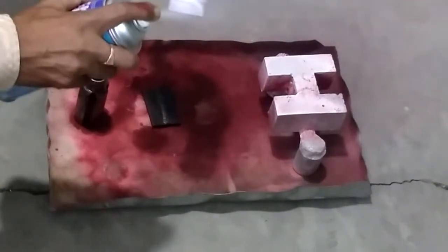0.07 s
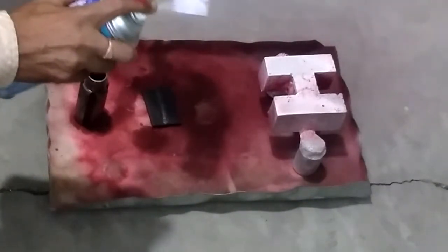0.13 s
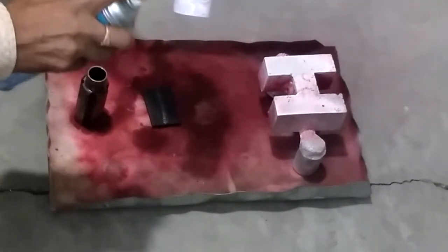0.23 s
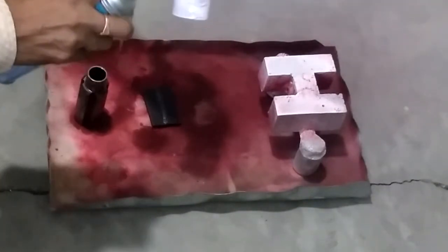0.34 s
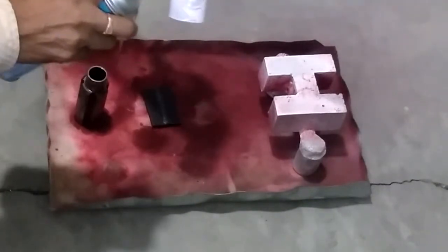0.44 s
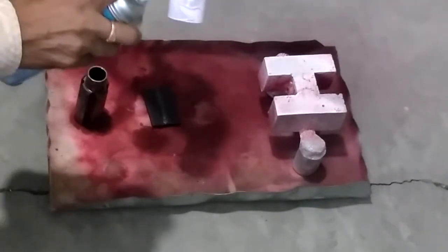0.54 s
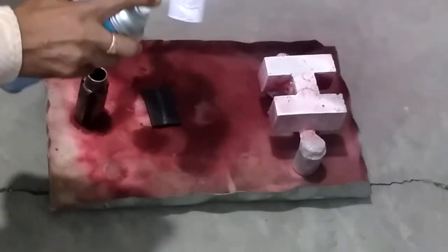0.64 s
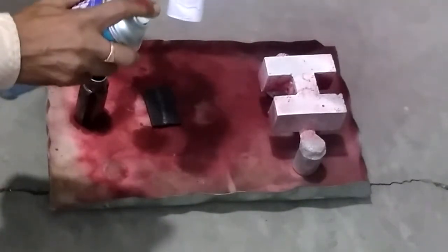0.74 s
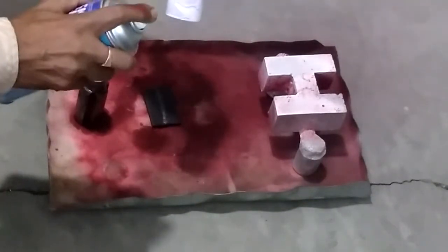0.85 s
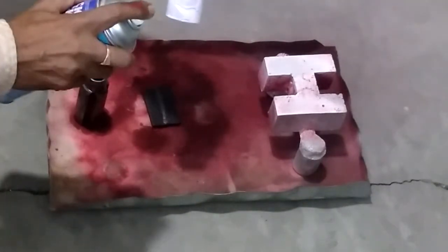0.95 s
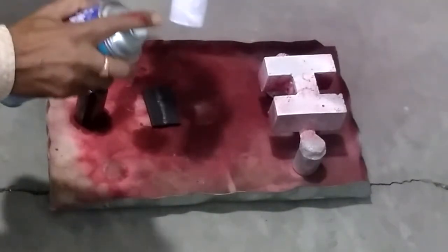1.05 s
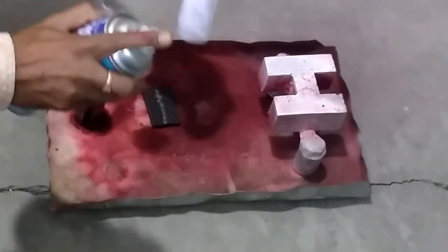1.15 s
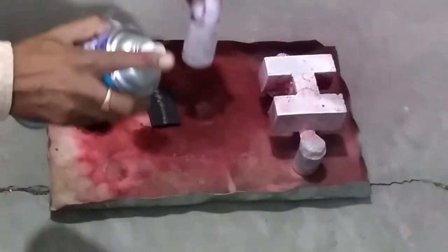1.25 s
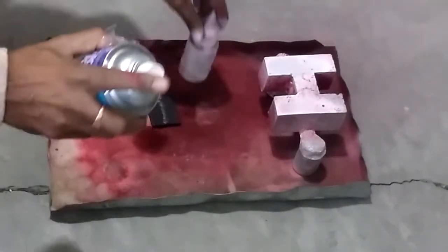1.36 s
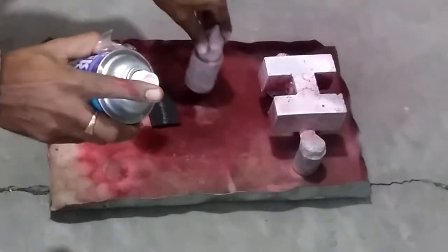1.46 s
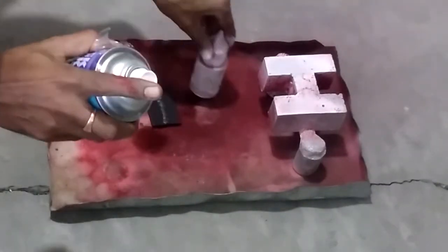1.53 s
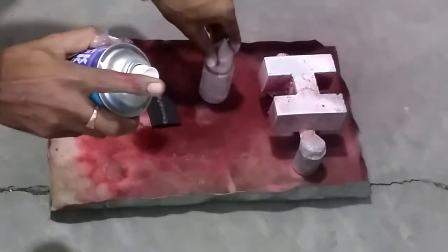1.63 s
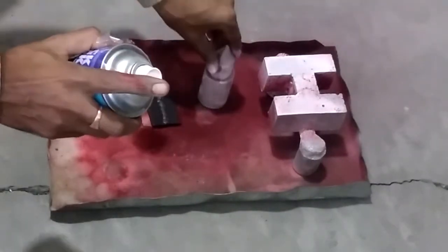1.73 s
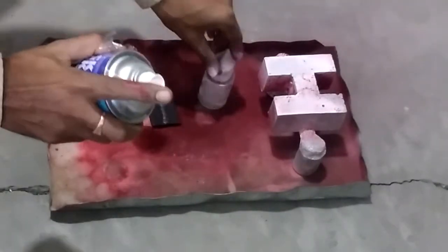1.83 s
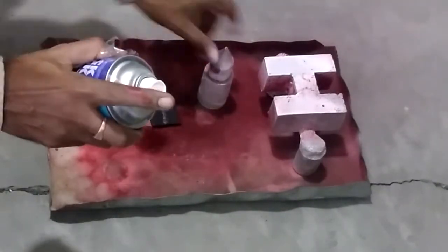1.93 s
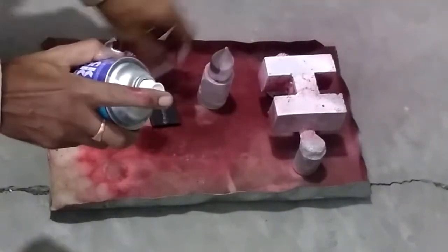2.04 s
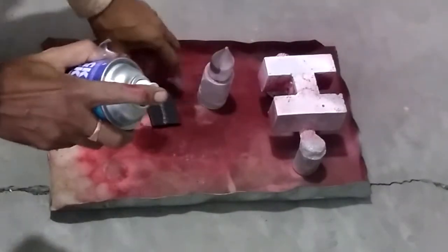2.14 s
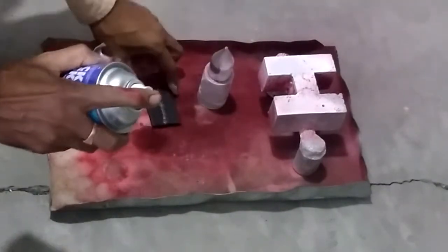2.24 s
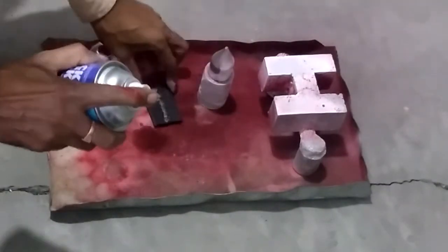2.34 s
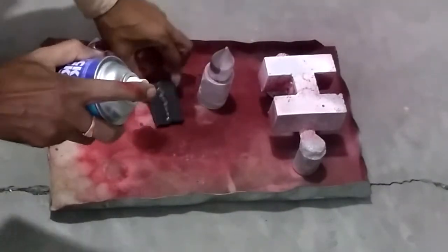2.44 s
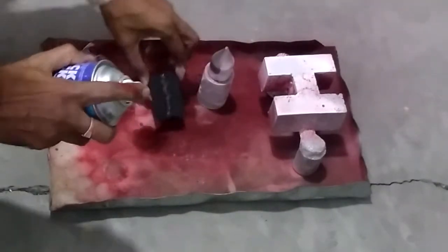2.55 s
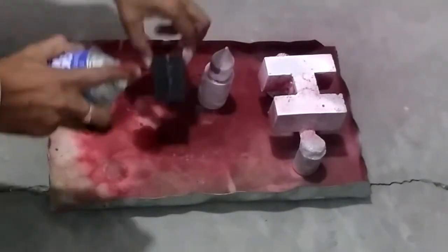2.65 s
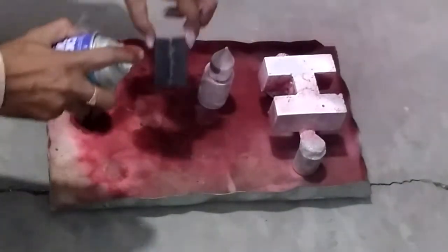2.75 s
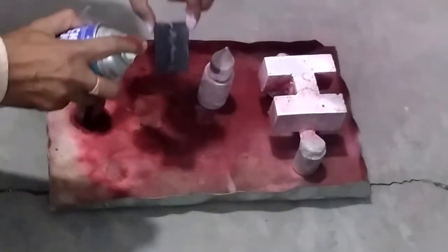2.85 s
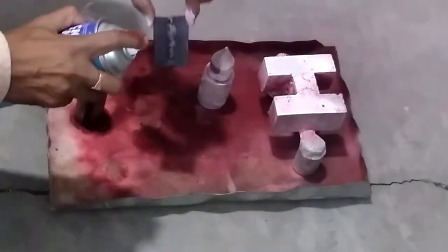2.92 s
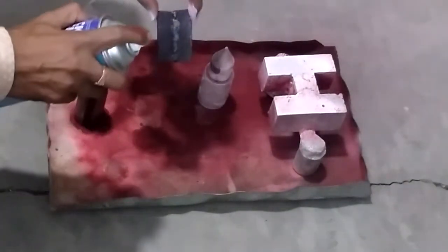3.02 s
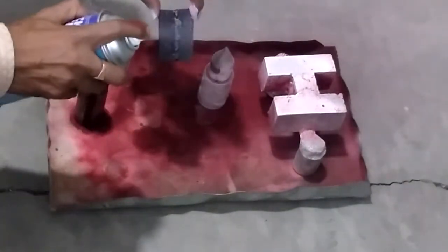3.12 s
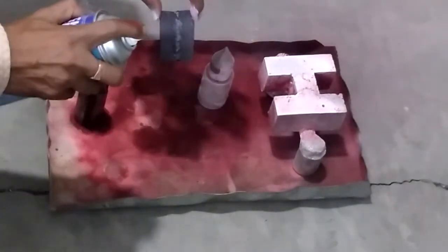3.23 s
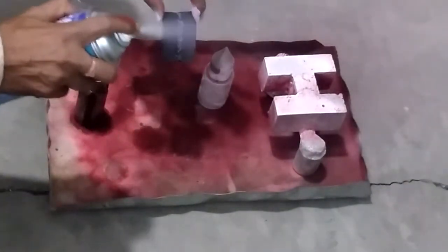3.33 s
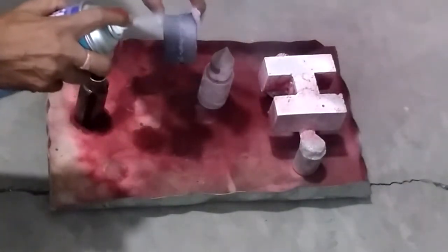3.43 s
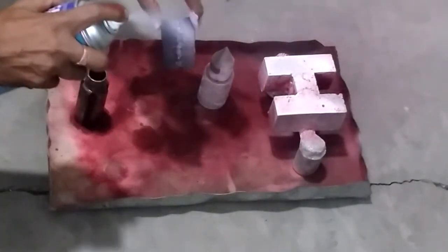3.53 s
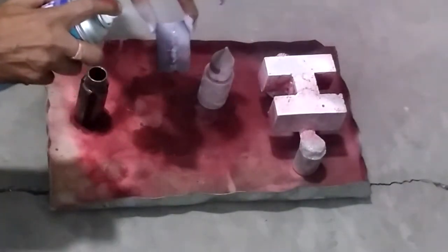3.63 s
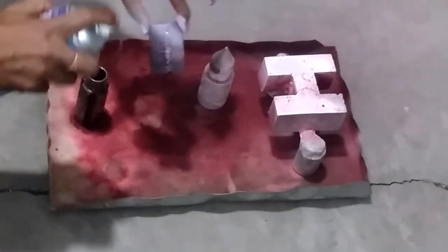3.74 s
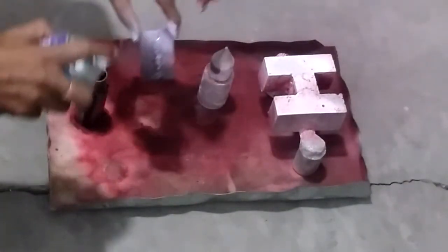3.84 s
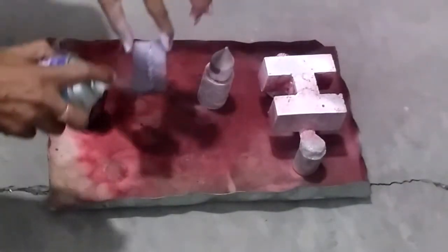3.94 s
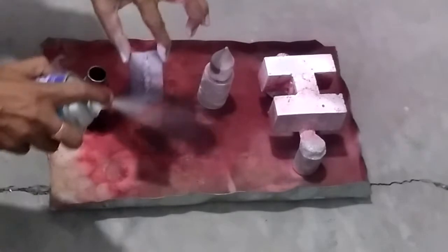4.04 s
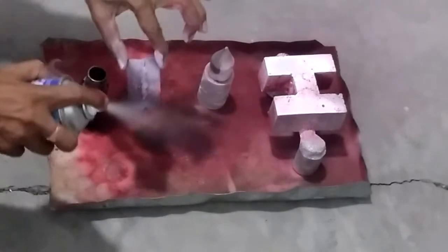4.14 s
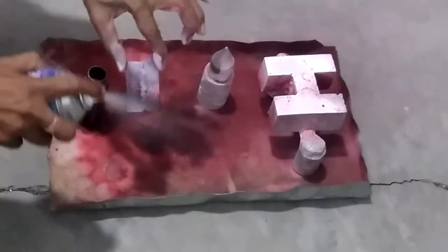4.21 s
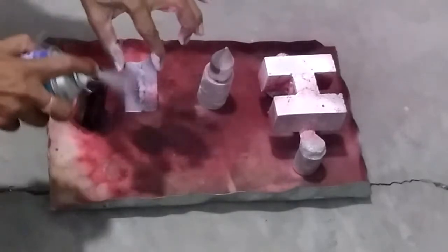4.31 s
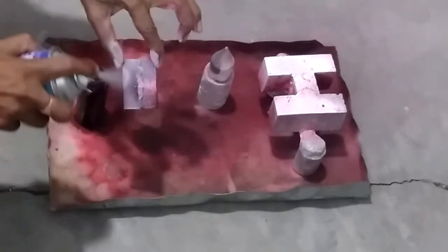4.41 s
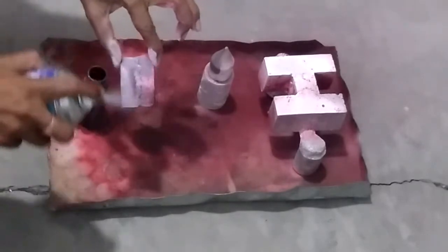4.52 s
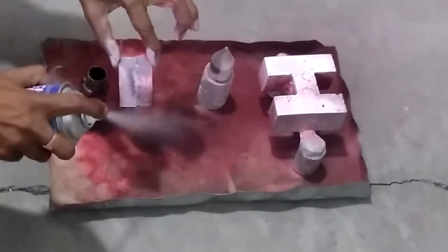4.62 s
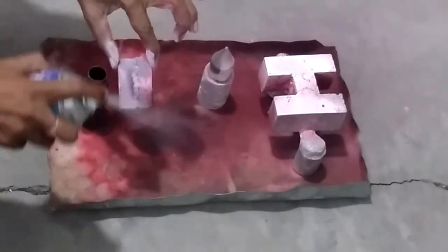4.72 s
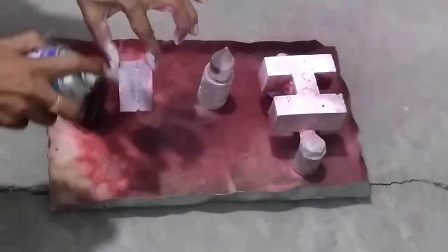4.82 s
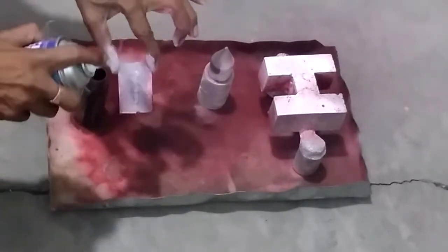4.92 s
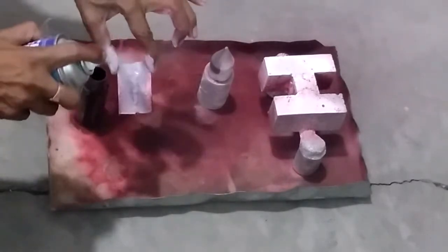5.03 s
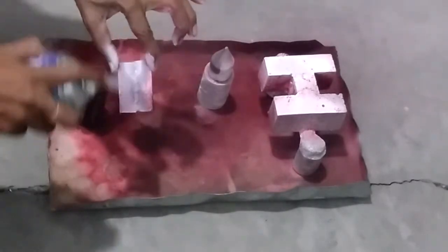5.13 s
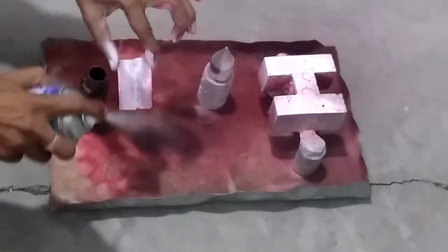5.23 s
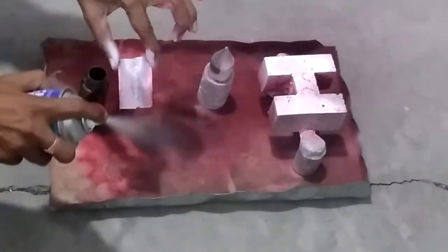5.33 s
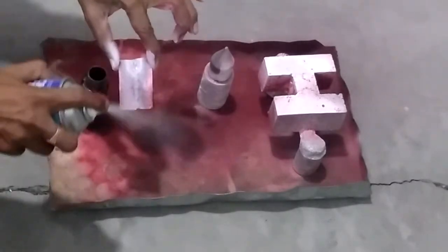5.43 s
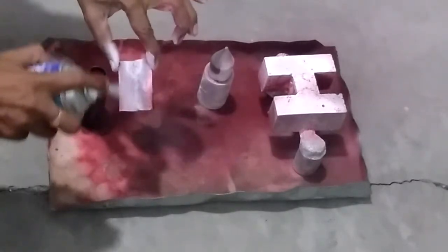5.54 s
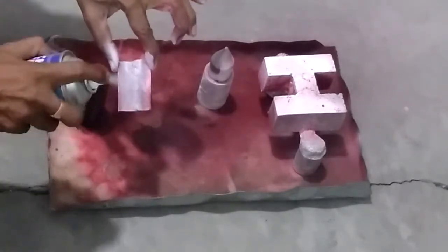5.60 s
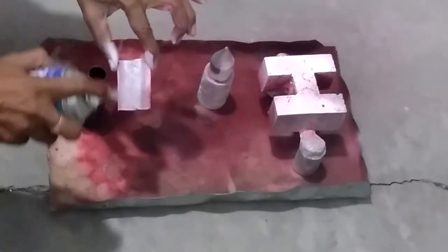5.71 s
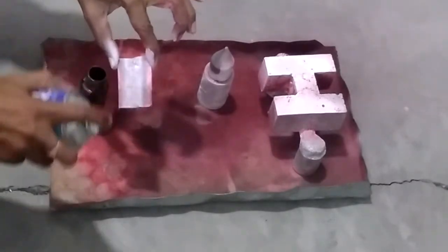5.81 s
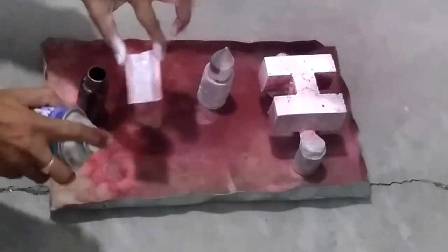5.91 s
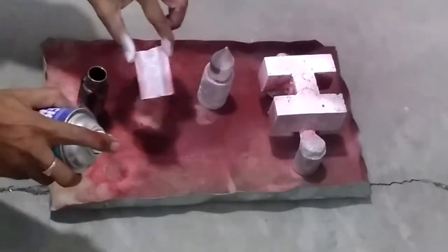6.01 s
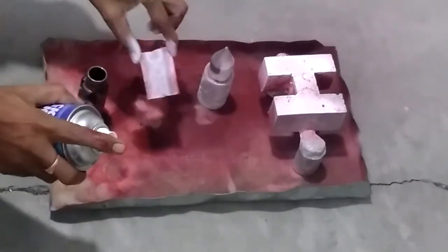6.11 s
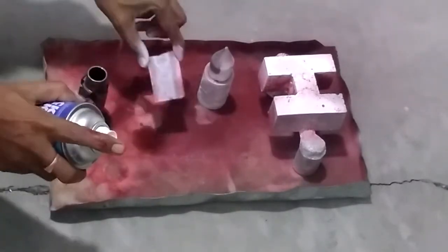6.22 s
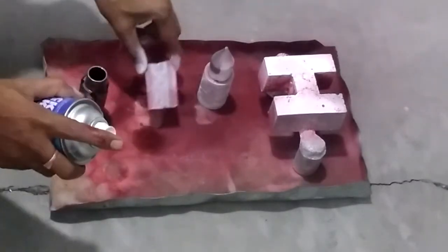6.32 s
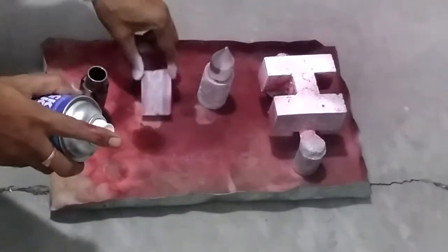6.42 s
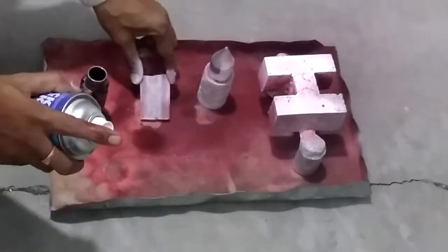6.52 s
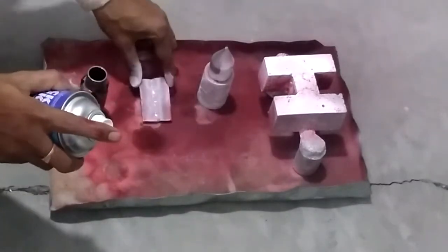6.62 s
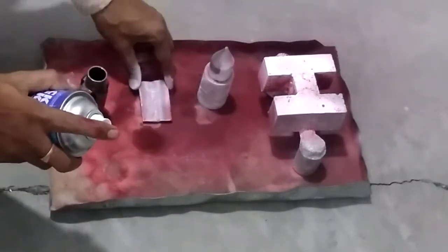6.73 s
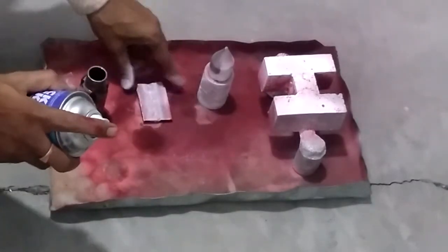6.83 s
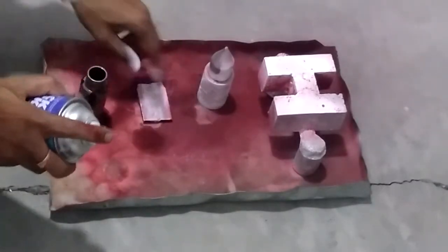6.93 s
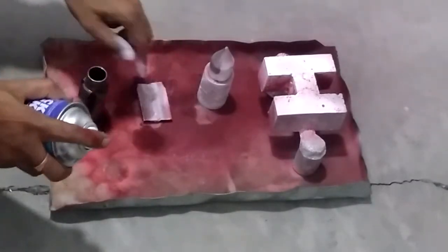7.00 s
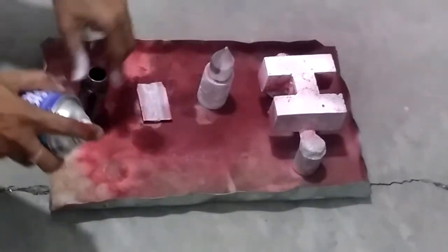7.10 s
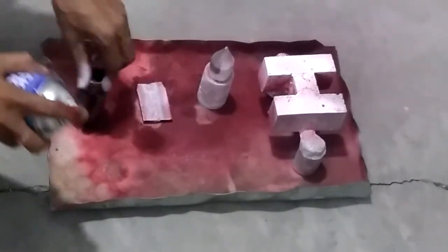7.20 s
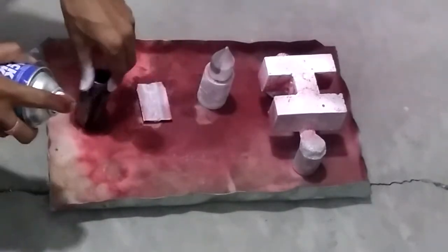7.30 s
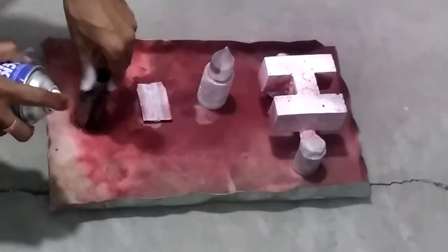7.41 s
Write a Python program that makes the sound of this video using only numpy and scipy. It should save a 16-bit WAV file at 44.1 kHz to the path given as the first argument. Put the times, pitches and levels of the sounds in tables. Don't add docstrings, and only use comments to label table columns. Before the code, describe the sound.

A spray can is already hissing at 0, close and airy with a hollow hum near 700 Hz, weakening and shutting off by 0.7 s. Quiet hall rumble and faint air follow, with a tiny tick at 1.0. At 1.7 a metal part clacks sharply on the board, with another knock at 1.8; softer thuds come at 2.2-2.35, while a far motor drones low and rises slightly until 2.8. At 3.0 the spray returns gently, strengthens at 3.25, dips around 3.8, then roars fully from 4.0 to 5.7 with small surges. As it closes, the valve spits trains of thin, high puffs from 5.7 to 6.2. Parts knock at 6.45 and 6.55, then a loud clack lands at 6.75. From 7.1 small clinks and scrapes chatter, with a firmer knock at 7.17, to the end. Short hard-hall echo; close stereo phone microphones.

```python
import sys
import numpy as np
from scipy import signal
from scipy.fft import rfft, irfft, next_fast_len
from scipy.io import wavfile
from scipy.ndimage import uniform_filter1d, map_coordinates

SR = 44100
rng = np.random.default_rng(int(sys.argv[2]) if len(sys.argv) > 2 else 0)


def volts_from_db(level):
    exponent = np.asarray(level, float) / 20
    return 10 ** exponent


def log_audio(samples):
    frames = np.atleast_2d(samples).T
    limited = np.clip(frames, -1, 1)
    pcm = np.round(limited * 32767).astype(np.int16)
    wavfile.write(sys.argv[1], SR, pcm)


N = 328986

# (frequency [Hz], likeness [0..1])
PORT_LIKENESS = [(60, 0.96), (500, 0.75), (1200, 0.12), (2500, 0.017), (15000, 0.012)]


def unit(x):
    return x / np.sqrt(np.mean(x ** 2) + 1e-20)


def along(points, hz):
    f, *columns = np.transpose(points)
    return np.array([np.interp(np.log(hz + 1), np.log(f + 1), column) for column in columns])


def wobble(rate):
    knots = rng.standard_normal(int(N * rate / SR) + 4)
    return map_coordinates(knots, [np.arange(N) * rate / SR])


def filtered(x, response):
    n = x.shape[-1]
    m = next_fast_len(n + 8192)
    return irfft(rfft(x, m) * response(np.fft.rfftfreq(m, 1 / SR)), m)[..., :n]


def modes(table):
    return lambda f: sum(volts_from_db(db) * 1j * f * w / (c * c - f * f + 1j * f * w) for c, w, db in table)


def at_ports(pair, alike=PORT_LIKENESS):
    def shares(hz):
        angle = np.arccos(np.clip(along(alike, hz)[0], -1, 1)) / 2
        return np.array([np.cos(angle), np.sin(angle)])

    mid, side = filtered(pair, shares)
    return np.array([mid + side, mid - side])


def rush(spectrum, patchy_db, alike=PORT_LIKENESS):
    z = signal.stft(rng.standard_normal((2, N)), nperseg=512)[2]
    field = uniform_filter1d(rng.standard_normal(z.shape[1:]), size=8, axis=0)
    field = uniform_filter1d(field, size=12, axis=1)
    pair = signal.istft(z * volts_from_db(patchy_db * unit(field)), nperseg=512)[1][:, :N]
    colored = filtered(pair, lambda hz: volts_from_db(along(spectrum, hz)))
    return unit(at_ports(colored, alike))


def spray():
    # (frequency [Hz], density [dB per Hz])
    hiss_spectrum = [(4000, -13.5), (7000, 0.5), (9000, -0.5), (10500, 0), (12000, 3.5), (13000, -2.5),
                     (14200, 5), (15500, 1)]
    # (frequency [Hz], density [dB per Hz])
    plume_spectrum = [(60, -52), (300, -5.5), (900, -1.5), (1300, 2), (2000, 3.5), (2650, 6.5),
                      (3000, -13.5), (3400, -0.5), (4500, -0.5), (7000, -5), (11000, -39), (16000, -41)]
    # (frequency [Hz], likeness [0..1])
    jet_likeness = [(300, .9), (1200, .75), (2100, .96), (3100, .96), (3600, .1), (6000, .05)]
    # (time [s], valve opening [dB], can hum [Hz])
    presses = [
        [(0.0, 0, 710), (0.05, 0.5, 730), (0.27, -3, 730), (0.4, 0, 740), (0.47, -0.5, 696), (0.6, -3.5, 683),
         (0.674, -25, 631), (0.74, -41, 650)],
        [(2.998, -47, 654), (3.006, -16, 655), (3.13, -8, 650), (3.23, -9.5, 704), (3.27, -1.5, 735),
         (3.52, 0, 675), (3.6, -0.5, 632), (3.72, -6, 646), (3.85, -12, 685)],
        [(3.85, -15, 685), (3.98, 1.5, 660), (4.1, 1, 685), (4.32, -1, 675), (4.68, 2, 670), (4.88, -2, 657),
         (5.35, 1.5, 720), (5.69, -0.5, 680), (5.8, -49, 700)],
    ]
    # (facing the phone at start [dB], at end [dB], grip damping the can [dB])
    facing = [(-10, -5, -2), (0, 0, -4), (-1, 0, 0.5)]
    jet_lags = [.000115, .00018, .00018]
    hiss_full_db, plume_full_db, can_full_db = -31.5, -41, -44.5
    plume_grows, can_grows = 0.96, 0.75
    wet_at_db, wet_over_db = -5.5, 0.6
    dry_plume_db, dry_can_db = -4.5, -13

    t = np.arange(N) / SR
    out = np.zeros((2, N))
    flutter_db = 0.32 * wobble(200)
    hiss = rush(hiss_spectrum, patchy_db=2.0) * volts_from_db(flutter_db)
    plume = rush(plume_spectrum, patchy_db=2.1, alike=jet_likeness)
    slow = filtered(rng.standard_normal((4, N)), lambda hz: 1 / (1 + (hz / 75) ** 2))
    swell = np.hypot(slow[:2], slow[2:])[[0, 1, 0, 1]]
    slow = slow / (swell + 1e-9) ** 0.26
    surge_db = 0.73 * wobble(12)
    can_swell_db = 2 * wobble(12)

    for rows, (first_db, last_db, grip_db), lag_s in zip(presses, facing, jet_lags):
        s, open_db, hum_hz = np.transpose(rows)
        open_db, hum_hz = np.interp(t, s, open_db), np.interp(t, s, hum_hz)
        gas_only = 1 / (1.5 + np.exp((open_db - wet_at_db) / wet_over_db))
        facing_db = np.interp(t, s[[0, -1]], [first_db, last_db])
        hiss_db = hiss_full_db + open_db + surge_db + facing_db
        plume_db = plume_full_db + plume_grows * open_db + surge_db + dry_plume_db * gas_only
        hum_db = can_full_db + grip_db + can_grows * open_db + can_swell_db + dry_can_db * gas_only
        phase = 2 * np.pi * np.cumsum(hum_hz) / SR
        hum = unit(at_ports(slow[:2] * np.cos(phase) + slow[2:] * np.sin(phase)))
        late = filtered(plume[1], lambda hz: np.exp(-2j * np.pi * hz * lag_s))
        jet = volts_from_db(hiss_db) * hiss + volts_from_db(plume_db) * np.array([plume[0], late])
        pressed = (t >= s[0]) & (t < s[-1])
        out += pressed * (jet + volts_from_db(hum_db) * hum)
    return out


def hall(x):
    # (frequency [Hz], time to fall 60 dB [s])
    decay_times = [(200, 1), (1200, 0.51), (4000, 0.45), (12000, 0.29)]
    hz, t, z = signal.stft(rng.standard_normal((2, SR * 3 // 4)), SR, nperseg=256)
    fading = z * volts_from_db(-60 * t / along(decay_times, hz).T)
    tail = at_ports(signal.istft(fading, SR, nperseg=256)[1])
    delayed = np.pad(x, (400, 0))[None]
    return signal.fftconvolve(delayed, tail / np.linalg.norm(tail[0]), axes=1)[:, :N]


def background():
    # (frequency [Hz], density [dB per Hz])
    room_spectrum = [(30, -21.5), (60, -2), (100, 3), (200, 0.5), (400, -9.5), (800, -19), (1600, -25.5),
                     (2800, -26), (3500, -28), (6500, -30.5), (8700, -26), (10500, -35), (15000, -37)]
    # (time [s], pitch [Hz], level [dB])
    motor = [(2.059, 120, -52), (2.11, 122.8, -47), (2.33, 122.4, -45.5), (2.39, 133.2, -47.5),
             (2.72, 132.8, -48.5), (2.85, 133, -72)]
    t = np.arange(N) / SR
    room = rush(room_spectrum, patchy_db=1.06)
    low = filtered(room, lambda hz: 1 / (1 + (hz / 450) ** 4))
    s, hz, db = np.transpose(motor)
    phase = 2 * np.pi * np.cumsum(np.interp(t, s, hz)) / SR
    drone = volts_from_db(np.interp(t, s, db, -99, -99)) * np.sin(phase)
    rumble = volts_from_db(-49.5 + 0.5 * wobble(1.89)) * low
    air = volts_from_db(-49) * (room - low)
    return rumble + air + drone * [[1], [.8]]


def knocks():
    # (time [s], pitch [Hz], level [dB])
    ticks = [(1.034, 2890, -38.5)]
    # (time [s], peak [dB], thud [dB], clink [dB], ring-out [s])
    landings = [(1.6814, -12.5, -23, -8.5, 0.17), (1.83, -15.5, -45, -12, 0.11), (2.168, -41, 0, -31, 0.18),
                (2.224, -38, -3.5, -35, 0.53), (2.332, -24.5, -15, -29, 0.12),
                (6.438, -16.5, -7, -37, 0.21), (6.485, -30.5, -30, -22, 0.31), (6.551, -20, -45, -37, 0.04),
                (6.656, -38, -29, -28, 0.14), (6.747, -6.5, -19.5, -24, 0.11),
                (7.125, -31, -21, -2.5, 0.088), (7.162, -26, -30, -16, 0.14),
                (7.174, -11.5, -19.5, -20, 0.22), (7.287, -20.5, -18, -6, 0.078),
                (7.425, -31, -11, -11, 0.037), (7.444, -34, -21, -18, 0.11)]
    # (frequency [Hz], width [Hz], level [dB])
    board_modes = [(660, 43, -4), (910, 49, -19), (1036, 28, 0), (1168, 53, 5.5), (1297, 78, -2.5),
                   (1488, 92, -1), (1647, 39, 0), (1910, 360, -8), (1730, 3350, -10.5)]
    # (frequency [Hz], width [Hz], level [dB])
    thud_modes = [(240, 22, 2.5), (308, 85, 0.5), (480, 105, -1)]
    # (frequency [Hz], width [Hz], level [dB])
    clink_modes = [(2150, 2440, 18), (3430, 1100, -30), (4440, 450, 21)]
    # (frequency [Hz], width [Hz], level [dB])
    grit_modes = [(6500, 1200, -17), (8760, 2900, 20), (12000, 8100, 6)]

    def soft(body, low_hz, top_hz):
        ring = modes(body)
        return lambda hz: ring(hz) / (1 + 1j * hz / top_hz) ** 4 / (1 - 1j * low_hz / (hz + 1)) ** 2

    out = np.zeros((2, N + SR))
    t = np.arange(SR // 3) / SR
    for s, db, thud_db, clink_db, ring_s in landings:
        chatter_s = 0.016 + 0.097 * ring_s
        force = volts_from_db(-60 * np.clip(t - chatter_s, 0, None) / max(ring_s, .01))
        force = force * (1 + 0.66 * np.exp(-t / 0.033))
        force = force * (1 - np.exp(-t / 0.0011 * volts_from_db(0.35 * (db + 11))))
        sparse = rng.standard_normal((2, len(t))) * (rng.random(len(t)) < .1)
        contacts = at_ports(sparse) * force
        contacts[:, 60] += 2.6 * volts_from_db(0.26 * (db + 6))
        spot = np.array(board_modes) * (1 + 0.047 * rng.standard_normal((len(board_modes), 3)))
        spot = spot + rng.normal(0, 0.88, (len(board_modes), 1)) * [0, 0, 1]
        board_top_hz = 2800 * volts_from_db(0.32 * (clink_db + 29.5))
        board = unit(filtered(contacts, soft(spot, 600, board_top_hz)))
        thud = unit(filtered(contacts, soft(thud_modes, 120, 900)))
        clink = unit(filtered(contacts, soft(clink_modes, 1200, 5500)))
        grit = unit(filtered(contacts, soft(grit_modes, 2500, 20000)))
        blow = board + volts_from_db(thud_db + 0.083) * thud + volts_from_db(clink_db + 4) * clink
        blow = blow + volts_from_db(-2 + 1.08 * clink_db) * grit
        level = volts_from_db(db - 16.5) * np.sqrt((0.029 + ring_s / 14) / 0.075)
        out[:, round(s * SR):][:, :len(t)] += level * blow * volts_from_db([[-2.5], [2.2]])
    for s, hz, db in ticks:
        tick = volts_from_db(db - 60 * t / 0.023) * np.sin(2 * np.pi * hz * t)
        out[:, round(s * SR):][:, :len(t)] += tick * [[1], [-.6]]
    return out[:, :N]


def valve():
    # (start [s], length [s], puff rate [per s], level [dB])
    sputters = [
        (5.72, 0.064, 190, -37),
        (5.82, 0.071, 200, -42),
        (5.905, .082, 175, -42),
        (6.001, 0.052, 215, -38),
        (6.05, 0.018, 180, -49),
        (6.089, .024, 680, -41.5),
        (6.15, .048, 200, -48.5),
    ]
    puffs = np.zeros(N)
    for start, length, rate, db in sputters:
        t = np.arange(0, length, 1 / SR)
        beat = np.flatnonzero(np.diff(np.floor(rate * t), prepend=-1))
        swell = np.sin(np.pi * (beat + 300) / (len(t) + 600)) ** 0.29
        uneven_db = 2.7 * rng.standard_normal(200)[:len(beat)]
        puffs[round(start * SR) + beat] = volts_from_db(db + 22.0 + uneven_db) * swell
    nozzle = modes([(8610, 200, 5.5), (9500, 660, -11)])
    treble = modes([(9000, 2600, 0)])
    ping = filtered(puffs, lambda hz: nozzle(hz) * treble(hz) ** 3)
    return np.array([volts_from_db(-6) * np.roll(ping, shift=2), volts_from_db(5.5) * ping])


def scene():
    can = spray() + valve()
    parts = knocks()
    answer = hall(volts_from_db(-11) * can[0] + volts_from_db(-8.0) * parts[0])
    return can + parts + answer + background()


def band_limit(x):
    return signal.sosfilt(signal.butter(12, 16070, fs=SR, output="sos"), x)


def record(dry):
    # (frequency [Hz], left [dB], right [dB])
    port_gains = [(30, -5, -10), (67.4, 1.5, 6.5), (231, 3, 5.5), (740, 1, 1.5), (3130, 0.5, 0.5),
                  (7870, -6, -2), (11000, -1.5, 3), (15100, -1.5, 2.5), (15800, -44, -42)]
    # (frequency [Hz], share taken from left [ratio], from right [ratio])
    cross_shares = [(100, 0.86, 1), (2540, 0.62, 0.7), (4630, 0.79, 0.94), (7040, 0.27, 0.34),
                    (9200, 0.57, 0.67), (9300, 0.057, 0.25), (11900, 0.07, 0.27)]
    steer_s = .00041
    ports = filtered(dry, lambda hz: volts_from_db(along(port_gains, hz)))
    other = filtered(ports[::-1], lambda hz: along(cross_shares, hz) * np.exp(-2j * np.pi * hz * steer_s))
    other = other - 0.55 * wobble(16) * np.gradient(other, axis=1)
    other = other * volts_from_db(0.88 * np.array([wobble(5.4), wobble(5)]))
    return band_limit(ports - other)


dry = scene()
out = record(dry)
log_audio(out)
```